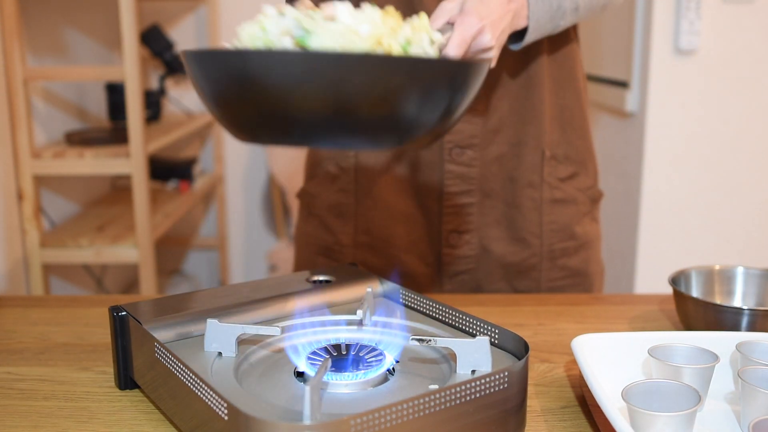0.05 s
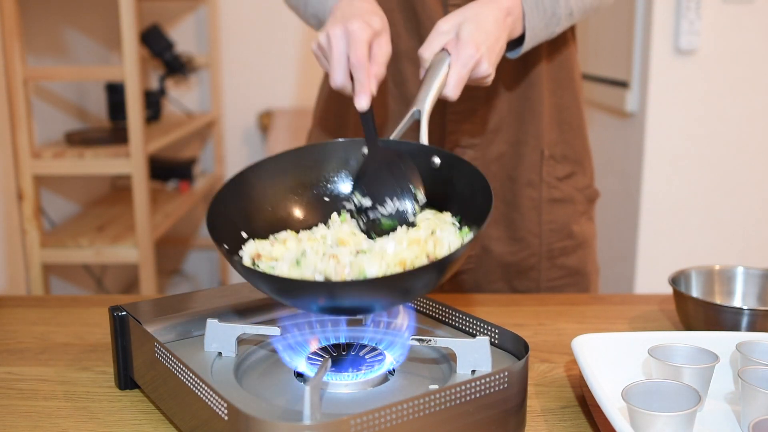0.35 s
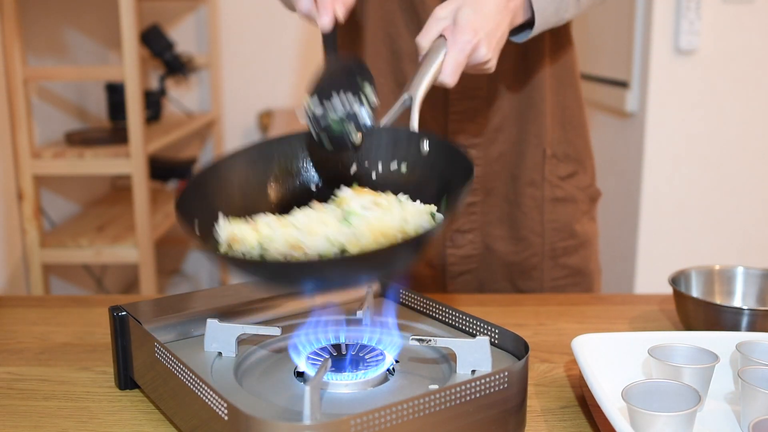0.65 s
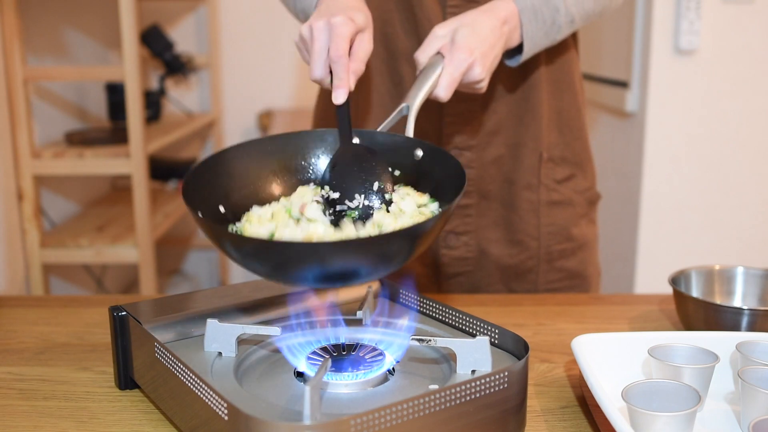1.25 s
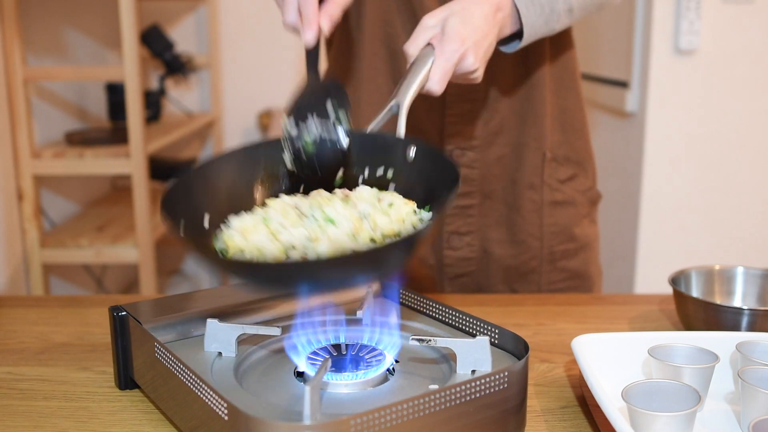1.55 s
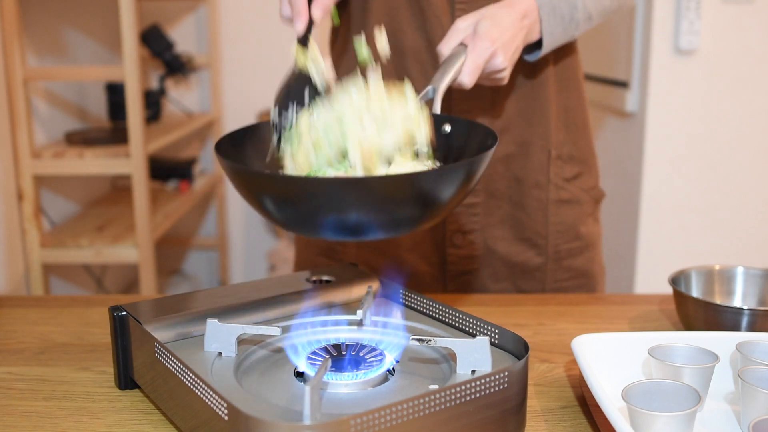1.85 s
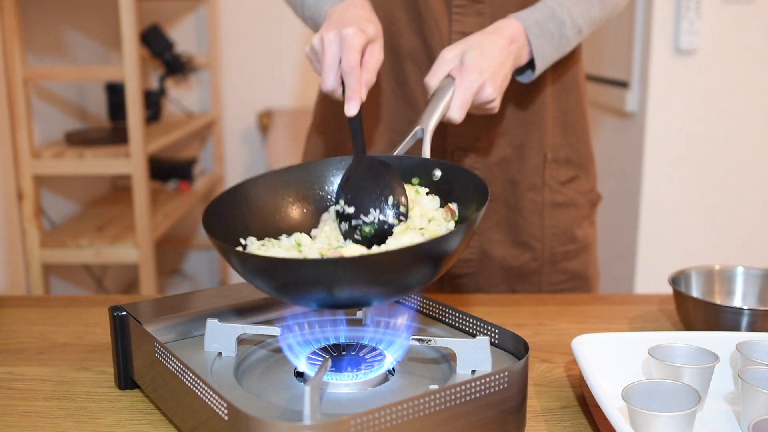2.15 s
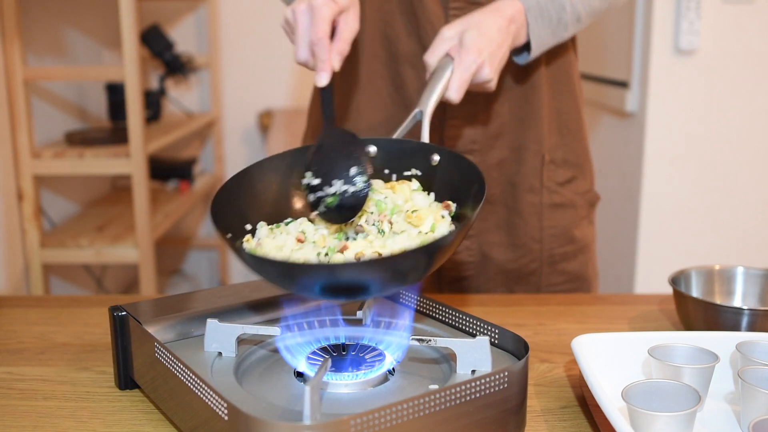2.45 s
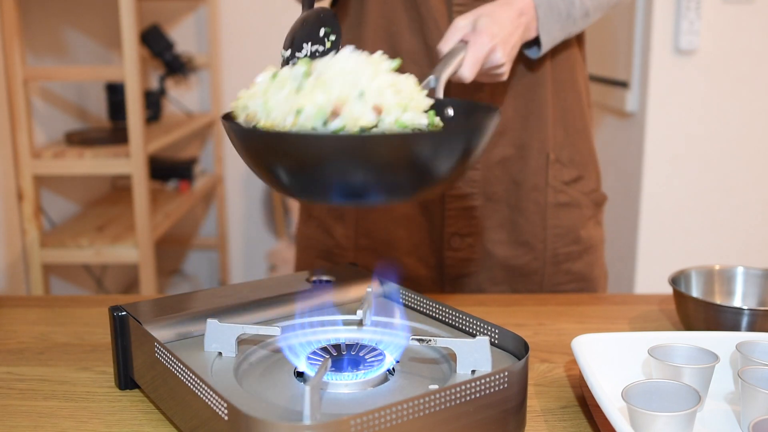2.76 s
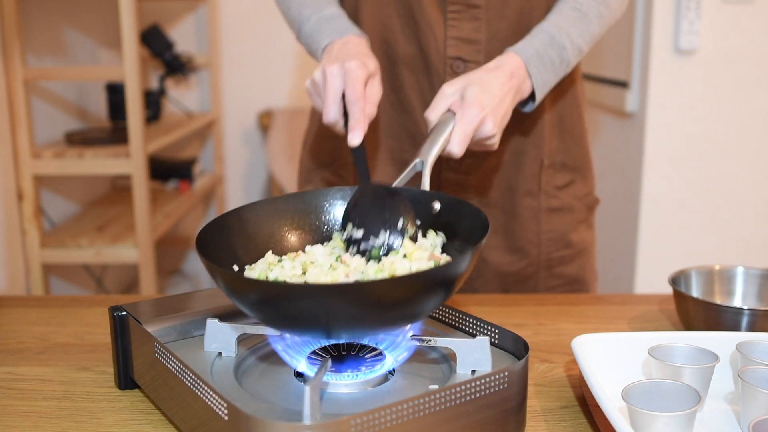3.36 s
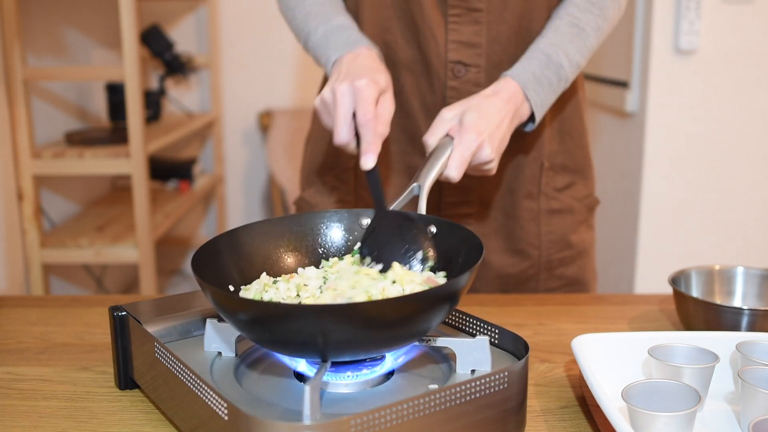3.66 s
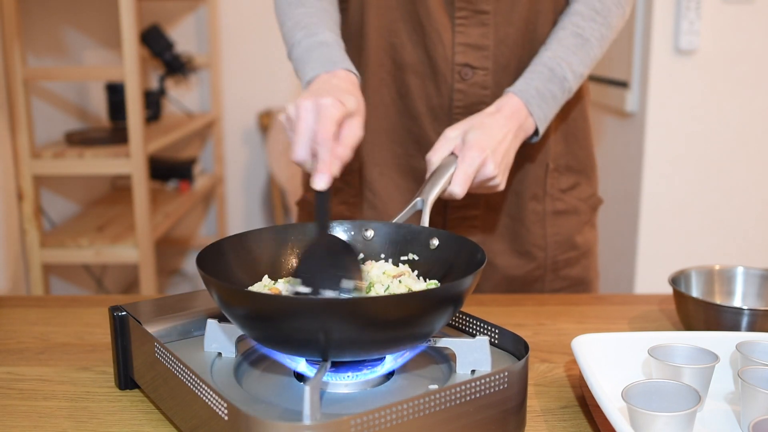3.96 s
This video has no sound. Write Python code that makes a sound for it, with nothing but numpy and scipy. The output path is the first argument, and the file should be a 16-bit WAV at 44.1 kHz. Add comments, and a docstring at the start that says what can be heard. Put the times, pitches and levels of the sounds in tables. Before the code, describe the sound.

Sizzling rice swells and dips as a wok is tossed, with spitting fat and ladle knocks.

```python
"""In a small kitchen, rice fries in a wok over the soft rush of a gas burner.
The sizzle is a swarm of tiny steam bursts. It sinks at each of four tosses, as the rice leaves
the hot steel, and swells as the rice lands and is stirred. Fat spits, a ladle knocks and scrapes,
and at last the wok is set down on the burner with a clatter."""
import sys
import numpy as np
from scipy import signal
from scipy.io import wavfile

SR = 44100
rng = np.random.default_rng(int(sys.argv[2]) if len(sys.argv) > 2 else 0)


def to_wav(s):
    """Save 16-bit WAV."""
    ch = np.atleast_2d(s).T  # columns
    pcm = np.round(np.clip(ch, -1, 1) * 32767)  # PCM
    wavfile.write(sys.argv[1], SR, pcm.astype(np.int16))


N = 176400  # 4 seconds


def amp(db):
    """Turns decibels into a number to multiply a sound by."""
    return 10 ** (np.asarray(db) / 20)


def unit(x):
    """Scales a signal so that its average power is 1."""
    return x / np.sqrt(np.mean(x ** 2) + 1e-20)


def read(points, hz):
    """Reads between the rows of a table, giving each octave about equal room."""
    row_hz, value = np.transpose(points)
    return np.interp(np.log(hz + 1), np.log(row_hz), value)


def add(mix, start_s, sound):
    """Adds a sound to the mix at the given time."""
    part = mix[round(start_s * SR):][:len(sound)]
    part += sound[:len(part)]


def click(colour, size=2048):
    """A click of energy 1 whose colour (its balance of low and high) follows a table."""
    hz = abs(np.fft.fftfreq(size, 1 / SR))
    log_gain = np.log(amp(read(colour, hz)))
    spectrum = np.exp(np.conj(signal.hilbert(log_gain)))  # packs the energy at the start
    pulse = np.fft.ifft(spectrum).real[:size // 2]
    return pulse / np.linalg.norm(pulse)


def through(x, response):
    """Makes every sample of x set off its own copy of the response."""
    return signal.fftconvolve(x, response)[:N]


def resonate(x, hz, width_hz):
    """Keeps the part of a sound near one pitch, which may move."""
    turn = np.exp(2j * np.pi * np.cumsum(hz * np.ones(len(x))) / SR)
    decay = np.exp(-np.pi * width_hz / SR)
    return 2 * (turn * signal.lfilter([1 - decay], [1, -decay], x / turn)).real


def drift(low_hz, high_hz, count=30):
    """A random wander, made of waves between two rates."""
    t = np.arange(0, N, 64) / SR
    rates = np.geomspace(low_hz, high_hz, count)
    wave = sum(np.sin(2 * np.pi * (hz * t + rng.random())) / np.sqrt(hz) for hz in rates)
    return np.interp(np.arange(N) / SR, t, unit(wave))


def swarm(per_s, spread_db):
    """Ticks at random times, many small and a few large."""
    size = amp(spread_db * np.minimum(rng.exponential(1, N), 3.22))  # capped, so none sticks out
    sign = rng.choice([-1, 1], N)
    happens = rng.random(N) < per_s / SR
    return unit(size * sign * happens)


def kitchen(x):
    """The room sends back a dense wash of echoes, in which the low notes last longest."""
    # Each row: frequency in Hz, seconds to fade by 60 dB.
    fade_times = [(200, 0.99), (1500, 0.27), (4000, 0.21), (9000, 0.15), (16000, 0.42)]
    echoes = rng.standard_normal(SR // 2) * (np.arange(SR // 2) > .003 * SR)  # begin after 3 ms
    hz, t, bands = signal.stft(echoes, SR, nperseg=256)
    fade = amp(-60 * t / read(fade_times, hz)[:, None])
    tail = signal.istft(bands * fade, SR, nperseg=256)[1]
    return through(x, tail / np.linalg.norm(tail))


def hum(waver=0.67):
    """The flame hums on two low tones, and the wok rings faintly above them."""
    # Each row: pitch in Hz, level in dB.
    tones = [(164, -62), (236, -61.5), (553, -65)]
    t = np.arange(N) / SR
    return sum(amp(db) * unit(np.sin(2 * np.pi * hz * t + waver * drift(2, 20))) for hz, db in tones)


def flame(level_db=-49, flutter_db=-1):
    """Burning gas makes a soft, low rush that flutters."""
    # Each row: frequency in Hz, relative level in dB.
    colour = [(20, -66), (50, -19), (100, -6.5), (160, 0), (195, 1), (235, -0.5), (310, -6), (430, -1),
              (530, -6), (620, -8.5), (1000, -4.5), (1600, -19), (5000, -17.5), (16000, -23)]
    rush = through(rng.standard_normal(N), click(colour))
    return rush * amp(level_db + flutter_db * drift(3, 30))


def wok_ring(push):
    """When pushed, the steel bowl rings at its own fixed pitches."""
    # Each row: pitch in Hz, relative level in dB, seconds to fade by 60 dB.
    tones = [(269, -17, .6), (420, -9, .4), (479, -5, .35), (554, 3, .27), (781, -13, .3), (824, -7, .35),
             (937, -4, .25), (1007, -1, .25), (1070, -7, .25), (1281, -6, .2), (1328, -4, .15),
             (1416, 0, .2), (1560, 0, .13), (2182, -6, .15)]
    t = np.arange(SR // 2) / SR
    ring = sum(amp(db - 60 * t / fade_s) * np.cos(2 * np.pi * hz * t) for hz, db, fade_s in tones)
    return through(push, ring / np.linalg.norm(ring))


def rice_thud(start_s=.33, level_db=-44.5, fade_s=0.57, hz=245, width_hz=55):
    """Tossed rice falls back and softly drums the bowl, once."""
    out, t = np.zeros(N), np.arange(SR // 3) / SR
    noise = rng.standard_normal(len(t))
    drum = resonate(resonate(noise, hz, width_hz), hz, width_hz)
    add(out, start_s, unit(drum) * amp(level_db - 60 * t / fade_s))
    return out


def ladle_slide(start_s=3.794, ring_hz=3700, ring_db=-22, swish_db=-32):
    """The ladle slides over the steel: a thin ring, and a swish that falls to the same pitch."""
    out, t = np.zeros(N), np.arange(SR // 4) / SR
    ring_fade_s, swish_fade_s = 0.26, .1
    ring_noise, swish_noise = rng.standard_normal((2, len(t)))
    ring = resonate(ring_noise, ring_hz, width_hz=220)
    swish_hz = np.maximum(6560 - 70000 * t, ring_hz)
    swish = resonate(resonate(swish_noise, swish_hz, width_hz=740), swish_hz, width_hz=740)
    add(out, start_s, unit(ring) * amp(ring_db - 60 * t / ring_fade_s))
    add(out, start_s, unit(swish) * amp(swish_db - 60 * t / swish_fade_s))
    return out


def wok_knocks(set_down_s=3.691):
    """Ladle, landing rice and burner grate hit the wok: tiny slips rasp, ring it and shake it."""
    # Each row: start in seconds, level in dB, seconds to rise, seconds to fade by 60 dB,
    # then how much harder the ring and the dull body are driven, both in dB.
    knocks = [ (.335, -34.5, .005, 0.17, -1, 3.5), (.944, -43, 0.0027, .1, -25, -14),
              (2.945, -26.5, 0.0087, .15, -18, -14), (3.165, -31, .003, .1, -7, -11),
              (3.418, -24, .002, .045, -12, 3), (3.434, -24, 0.0033, .08, -14, -19),
              (3.688, -15.5, 0.0048, 0.15, -3, -2.5), (3.72, -31, 0.0087, 0.31, 4, 5),
              (3.983, -26, 0.0088, .2, -4, 2)]
    # The rubbing contact. Each row: frequency in Hz, relative level in dB.
    rasp_colour = [(20, -64), (150, -52), (600, -5), (1400, 12), (2600, 7), (3700, 12.5), (5000, 4),
                   (8000, -3.5), (16000, -11)]
    # The wok's dull body. Each row: frequency in Hz, relative level in dB.
    body_colour = [(15, -50), (35, -28), (70, -21), (150, -19), (320, -11), (460, 1), (650, -5), (1300, -1),
                   (2200, -8), (5000, -28), (16000, -50)]
    rub, strike, shake, blow = np.zeros((4, N))
    t = np.arange(SR // 2) / SR
    for start_s, db, rise_s, fade_s, ring_db, body_db in knocks:
        force = np.minimum(t / rise_s, 1) * amp(db - 60 * np.maximum(t - rise_s, 0) / fade_s)
        add(rub, start_s, force)
        add(strike, start_s, force * amp(ring_db))
        add(shake, start_s, force * amp(body_db))
    add(blow, set_down_s, amp([6]))  # one firm blow as the wok meets the grate
    slips = swarm(per_s=9000, spread_db=1.5)
    rattle = swarm(per_s=9000, spread_db=1.5)
    rasp = through(slips * rub, click(rasp_colour))
    steel = wok_ring(amp(-6) * slips * strike + blow)
    body = amp(-6) * through(rattle * shake, click(body_colour, size=8192))
    return rasp + steel + body


def fat_spits(spray_fade_s=.003):
    """Fat spits in single large bursts: a pop with a sharp snap and a very short spray."""
    # Each row: start in seconds, level of the pop in dB, snap compared with the pop in dB.
    spits = [(.0865, -27, 6), (.1565, -24, -1), (0.2596, -7.5, 5), (0.292, -4, 0), (.3226, -12, 5),
             (.342, 5.5, -18), (0.594, -10, -3), (1.3484, -7, -5), (1.377, -3, -7), (1.4058, -3, -5),
             (1.469, -8, -8), (2.1851, 0, -6), (2.614, 0.5, -9), (3.0255, -5, 2), (3.168, 1, -3),
             (3.2506, -5, -7), (3.4198, 2, -15), (3.436, -2, -1), (3.459, -7, 2), (3.4685, -20, 16),
             (3.5098, -6, -1), (3.5307, 2, -6), (3.5916, 4, -3.5), (3.9008, -6, 0)]
    # The colours of pop and snap. Each row: frequency in Hz, relative level in dB.
    pop_colour = [(100, -33), (500, -20.5), (1300, -9.5), (2600, -8.5), (3600, 6.5), (4400, -6.5),
                  (5500, -18), (8000, -21), (16000, -33)]
    snap_colour = [(500, -22), (3000, 0), (6000, -9), (9000, 3), (13000, 0), (16000, -4)]
    pop_click, snap_click = click(pop_colour), click(snap_colour)
    out, t = np.zeros(N), np.arange(SR // 50) / SR
    for start_s, db, snap_db in spits:
        spray = rng.standard_normal(len(t)) * amp(-60 * t / spray_fade_s)
        spray *= amp(10) / np.linalg.norm(spray)
        spray[0] = 1  # the opening tick, about 10 dB weaker than the whole spray
        pop, snap = np.convolve(pop_click, spray), np.convolve(snap_click, spray)
        spit = pop / np.linalg.norm(pop) + amp(snap_db) * snap / np.linalg.norm(snap)
        add(out, start_s, amp(db) * spit)
    return out


def sizzle(flicker_db=.5, clump_db=0.7):
    """Steam bursts and a finer fizz swell and sink as the rice meets and leaves the hot steel."""
    # Each row: time in seconds, relative level in dB, extra change for the fizz alone in dB.
    contact = [(0.0, -30, -13), (0.08, -39.5, -15), (0.14, -39.7, -10.5), (0.3, -27.5, -6.5),
               (0.37, -28, -11), (0.44, -24, -5.5), (0.55, -28.5, -9.5), (0.61, -29.5, -9),
               (0.7, -25, -7.5), (0.8, -27, -8.5), (0.9, -40.5, -15), (0.98, -31.3, -11.5),
               (1.08, -30.2, -16), (1.14, -24.5, -9.5), (1.19, -24, -7.5), (1.26, -26.1, -12),
               (1.37, -22.5, -6), (1.45, -26.5, -12), (1.51, -25.5, -9), (1.57, -22.5, -8.5),
               (1.69, -28.5, -9.5), (1.78, -39, -13), (1.83, -41.5, -8), (1.9, -31.5, -6.5),
               (1.99, -29, -13.5), (2.03, -26.5, -8.5), (2.22, -23, -7), (2.41, -28.0, -12.5),
               (2.49, -29.2, -11), (2.55, -25, -10), (2.62, -25.5, -7.5), (2.71, -27.0, -9.5),
               (2.83, -38.5, -15), (2.88, -38, -5.5), (2.98, -26, -12.5), (3.1, -27, -8.5),
               (3.16, -24.5, -8.5), (3.22, -26.5, -6.5), (3.3, -23.5, -10.5), (3.43, -23.5, -11),
               (3.65, -27, -10.5), (3.86, -26.4, -11), (4.0, -29.5, -8)]
    # The colours of bursts and fizz. Each row: frequency in Hz, relative level in dB.
    burst_colour = [(100, -36), (300, -27.5), (550, -17.5), (900, -14.5), (1300, -8.5), (2600, -5),
                    (3300, -1), (3850, 1), (4300, -4), (5000, -8), (7000, -10.5), (8800, -14.5),
                    (10000, -18.5), (16000, -32)]
    fizz_colour = [(500, -68), (4000, -10.5), (7000, 11.5), (10000, 4), (13000, 5), (16000, 0)]
    times, level_db, fizz_db = np.transpose(contact)
    t = np.arange(N) / SR
    level = amp(np.interp(t, times, level_db) + flicker_db * drift(12, 90))
    fizz_share = amp(np.interp(t, times, fizz_db))
    bursts = swarm(per_s=9000, spread_db=3)
    bursts = unit(bursts * amp(clump_db * drift(70, 300)))  # clumps a few milliseconds long
    fine_ticks = unit(swarm(per_s=6000, spread_db=3.5) + .5 * bursts)  # each burst fizzes a little too
    steam = through(bursts * level, amp(1.2) * click(burst_colour))
    fizz = through(fine_ticks * level * fizz_share, amp(4) * click(fizz_colour))
    return steam + fizz


def scene(ring_db=-24, room_db=-11.5):
    """Mixes pan, room and flame, the same in both channels."""
    frying = sizzle()
    pan = frying + fat_spits() + wok_knocks() + ladle_slide() + rice_thud()
    pan += amp(ring_db) * wok_ring(frying)  # the sizzle makes the wok ring faintly
    mono = pan + amp(room_db) * kitchen(pan) + flame() + hum()
    return np.array([mono, mono])


def record(dry, ceiling=.85, cutoff_hz=15800):
    """Rounds off the sharpest peaks, then removes the very highest treble."""
    rounded = dry / (1 + (dry / ceiling) ** 4) ** .25
    low_pass = signal.firwin(511, cutoff_hz, window=("kaiser", 9), fs=SR)
    return signal.oaconvolve(rounded, low_pass[None], "same")


dry = scene()
out = record(dry)
to_wav(out)
```